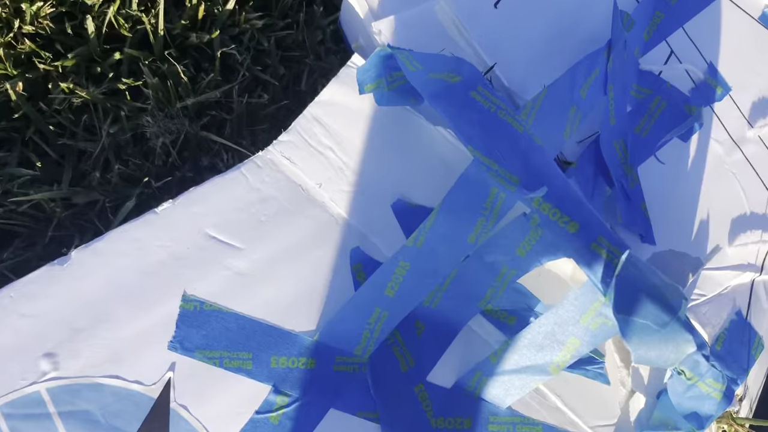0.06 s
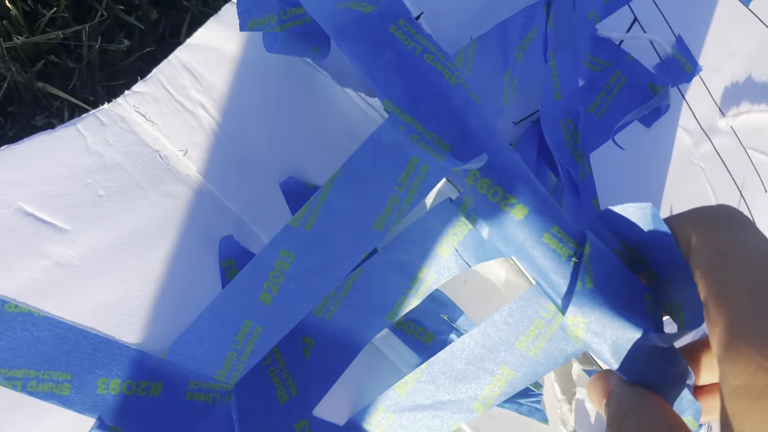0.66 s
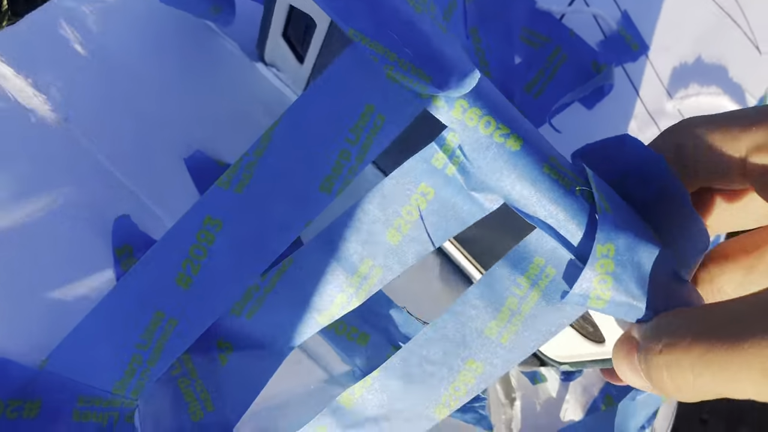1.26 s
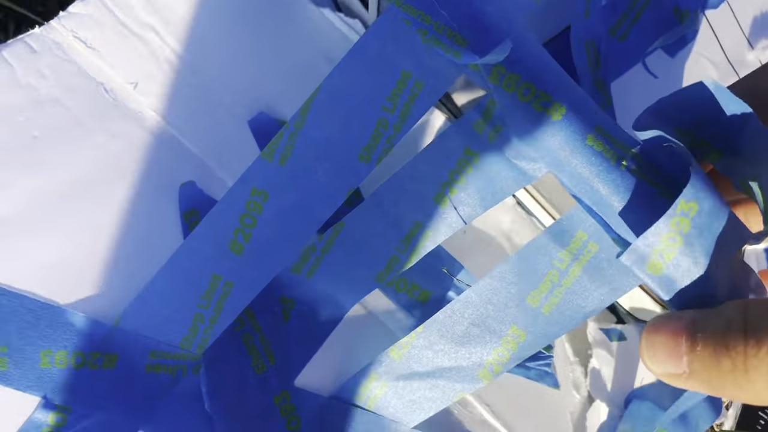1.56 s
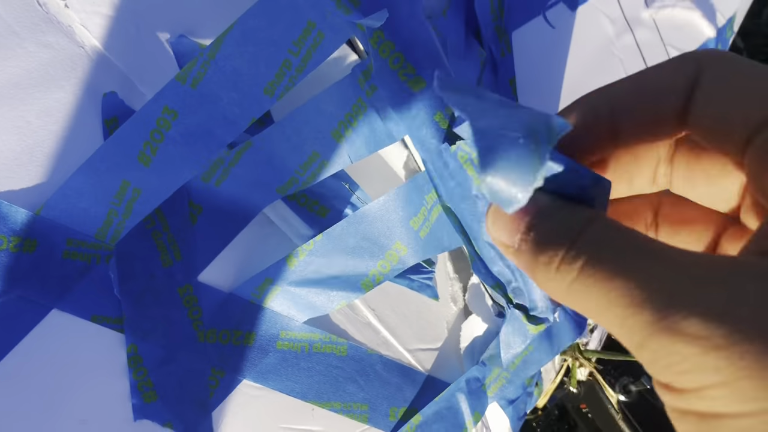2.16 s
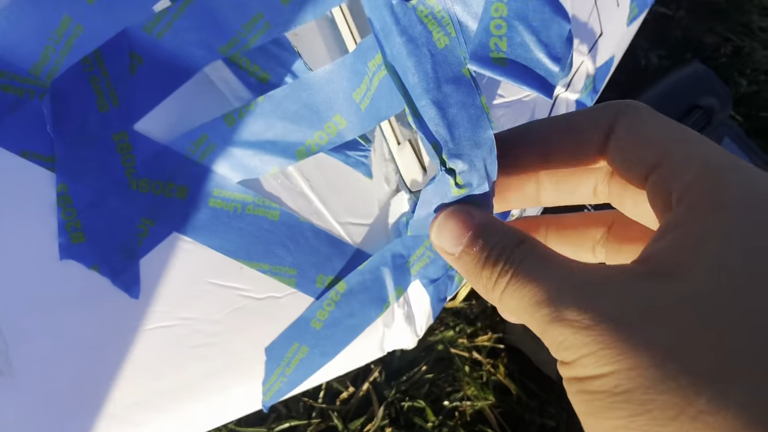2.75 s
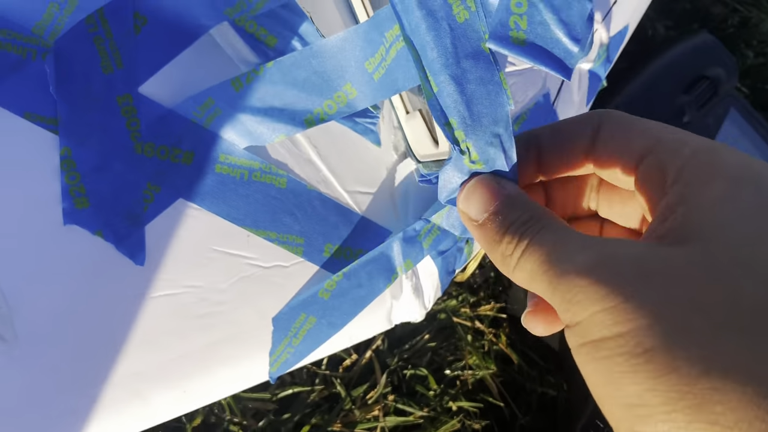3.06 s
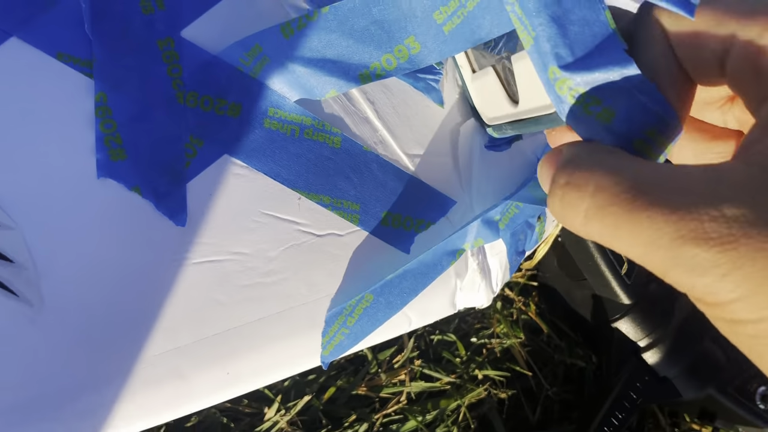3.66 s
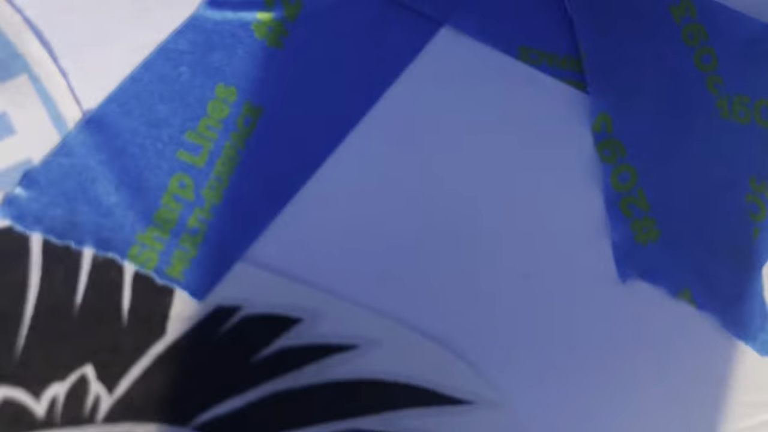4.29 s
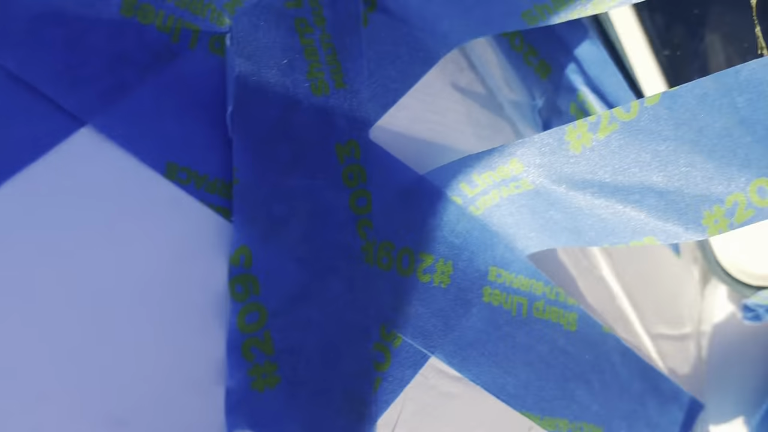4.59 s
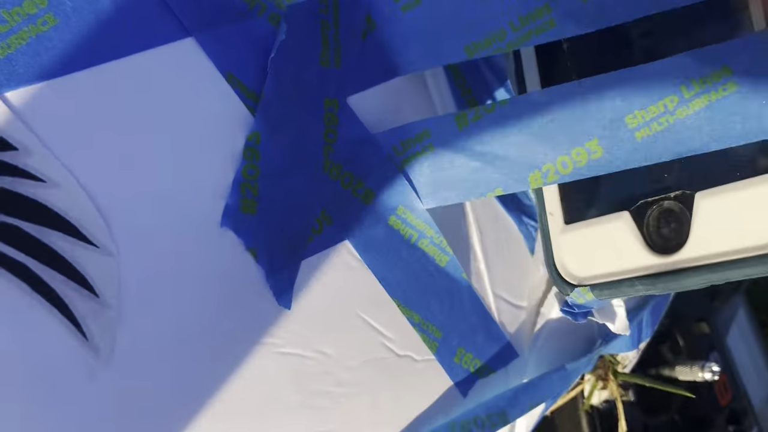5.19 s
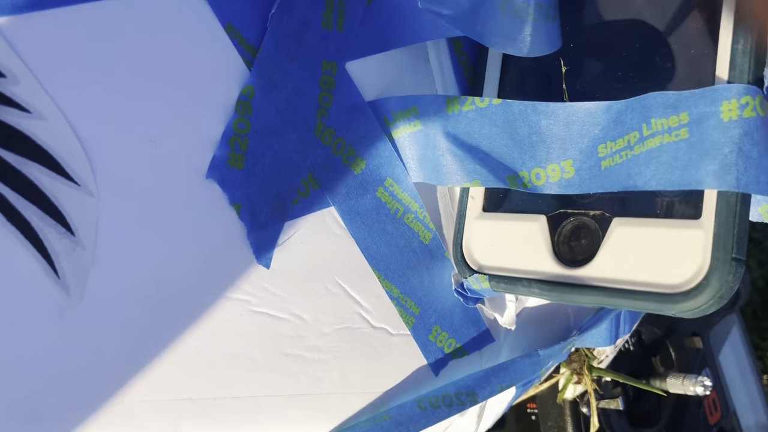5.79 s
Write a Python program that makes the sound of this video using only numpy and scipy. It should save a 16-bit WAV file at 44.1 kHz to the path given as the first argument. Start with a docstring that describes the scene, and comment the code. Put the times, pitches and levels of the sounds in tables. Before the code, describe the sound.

Outdoors, a distant bird chirps very faintly as close, dry crackling begins: a hand is peeling tape off a stiff sheet. Uneven pulls bring crinkles, sharp snaps, brief rips and the hiss of skin sliding on tape. The sheet buckles with hollow knocks. Toward the end the microphone moves closer with a low handling rumble, and the pops and crackles get louder before dying down.

```python
"""Close, dry crackling and snapping: fingers pick and pull at painter's tape stuck over a stiff sheet.
The glue lets go in countless tiny ticks, creases snap, short lengths rip free and skin slides on tape.
Underneath, the tugged sheet pops and rumbles, growing stronger as a hand-held phone comes close.
Far behind, a bird chirps faintly in the hush of the open air."""
import sys
import numpy as np
from scipy import signal
from scipy.fft import rfft, irfft
from scipy.io import wavfile
from scipy.ndimage import uniform_filter1d

SR = 44100
rng = np.random.default_rng(int(sys.argv[2]) if len(sys.argv) > 2 else 0)


def wrap_up_sound(samples):
    """Save the sound to the file named by the first command line argument, as 16-bit audio."""
    columns = np.atleast_2d(samples).T
    # keep every value between -1 and 1, then stretch to whole-number steps
    tamed = np.clip(columns, -1, 1)
    steps = np.round(tamed * 32767).astype(np.int16)
    wavfile.write(sys.argv[1], SR, steps)


N = 261634

# the louder creases snapping: start_s, level_db (before trim), pitch_hz, crack_db (relative), crumple_s
CREASE_SNAPS = [(.7437, -20, 4700, 1.5, 0.0026), (.7630, -26, 2920, 4.5, 0.006),
                (0.816, -30, 2230, -10, 0.0016), (0.8556, -32, 3620, 3, 0.0011),
                (0.9779, -30.5, 7040, -1, 0.00093), (1.0016, -20.5, 4040, -11, 0.0017),
                (1.062, -19.5, 3800, 1, 0.0012), (1.1155, -31.5, 7200, 7.5, .0006),
                (1.2097, -16.5, 1840, 5.5, 0.0015), (1.3383, -32, 4660, -4, 0.0016),
                (1.4447, -28.5, 4060, -2, 0.00046), (1.4923, -30, 2200, 4.5, 0.00049),
                (1.552, -24.5, 3620, -7, 0.001), (1.661, -25, 1860, 9.5, 0.0031),
                (1.668, -22, 3750, 0.5, 0.0013), (1.899, -22.5, 5000, 9, 0.0016),
                (1.9628, -34, 4900, 11, .0016), (2.0785, -26.5, 6200, 12, 0.0017),
                (2.111, -30.5, 2840, 12, 0.007), (2.1195, -32, 2560, 10.5, 0.002),
                (2.1553, -27.5, 4370, 5.5, 0.00086), (2.2400, -34.5, 5000, 11, 0.00033),
                (2.271, -26.5, 5100, 6, .0012), (2.299, -20, 1090, -0.5, 0.00058),
                (2.3239, -25, 970, 4, 0.00093), (2.409, -21, 2660, -5, 0.00088),
                (2.4988, -25.5, 1470, 4.5, 0.0032), (2.5348, -23.5, 910, 3, .0007),
                (2.5486, -32, 1800, 8.5, .0044), (2.9368, -35.5, 1700, 0.5, 0.0016),
                (2.996, -19, 1780, 6, 0.0022), (3.0019, -19.5, 1360, 1, 0.00044),
                (3.024, -27, 2190, -2, .0028), (3.1067, -31.5, 1200, 2.5, 0.00038),
                (3.2414, -28.5, 4620, 3.5, 0.0038), (3.3245, -31.5, 1620, 9, 0.00023),
                (3.4397, -13.5, 3600, -21, 0.0013), (3.4491, -19, 1550, 4.5, 0.0009),
                (3.8106, -21, 5160, -0.5, 0.00074), (3.9536, -29.5, 1080, -0.5, .001),
                (4.115, -22, 1130, 1, 0.00091), (4.1619, -22, 1310, 6.5, 0.0042),
                (4.237, -17, 4970, -15, 0.00083), (4.2647, -22.5, 1550, -25, 0.0016),
                (4.321, -15, 5700, 2, 0.00059), (4.421, -23.5, 2640, 6.5, 0.0017),
                (4.486, -19.5, 5720, -4, 0.0013), (4.5605, -21.5, 2950, 3, 0.001),
                (4.618, -24, 1430, 0, 0.00058), (4.647, -17, 1190, 6, .0038),
                (4.658, -17.5, 1180, 3, .0015), (4.6646, -10.5, 1520, 2, 0.0026),
                (4.7037, -21.5, 4840, 3, 0.00052), (4.7664, -21, 3380, 1.5, .0054),
                (4.7952, -25, 7160, 10, 0.0011), (4.835, -22, 2540, 3.5, 0.0018),
                (4.8407, -15, 4060, -3.5, 0.00048), (4.8663, -19, 5050, 5, 0.0011),
                (5.0556, -30.5, 1460, .5, 0.00088), (5.1342, -21.5, 1880, 7, 0.0049),
                (5.2138, -19, 890, -1.5, 0.00098), (5.4422, -26, 2375, 13, 0.0037),
                (5.459, -19, 920, 7, 0.0022), (5.47, -23.5, 890, 12, 0.0015), (5.5746, -21, 7300, 2, .0005),
                (5.745, -38.5, 1580, -7, .0015), (5.8835, -42.5, 5400, -11, 0.0018)]
# finger pulls: start_s, length_s, level_db, growth_db, glue_db (relative), crackle_db (relative)
FINGER_PULLS = [(.36, 0.19, -60, -1, 2, -1.5), (0.782, 0.17, -62.5, -9, 8.5, -9),
                (0.989, .35, -49.5, -3.5, -1.5, -6.5), (1.458, 0.2, -45, 5, -1.5, -7.5),
                (1.70, 0.091, -42, 12, -6, -7.5), (1.941, .46, -46, -4.5, 1, -1.5),
                (2.40, 0.18, -41.5, -5.5, -3, -3.5), (2.80, 0.038, -50, 6, -4, -11),
                (2.95, 0.21, -53.5, -8, -2, -0.5), (3.188, 0.15, -50, 8.5, -0.5, -0.5),
                (3.399, 0.071, -45, -1, -2, -7), (3.52, 0.72, -53, -5.5, 1, 0.5),
                (4.099, .17, -42, 3.5, -7.5, -6), (4.28, 0.14, -47.5, 7, -1.5, -6.5),
                (4.518, 0.048, -43, -2, 3.5, 1), (4.70, 0.18, -49, -10, 3.5, 2.5),
                (4.90, 0.36, -52.5, 9, 6.5, 0.5), (5.27, .19, -40, 4, 4, -5.5),
                (5.509, 0.094, -39.5, -14.5, -3.5, -1), (5.66, 0.078, -58.5, 0, -6, 2),
                (5.849, .05, -60, -9, 1, 10)]
# light finger contact between pulls: start_s, length_s, level_db, growth_db
FINGER_TOUCHES = [(0.303, 2.34, -54.5, 7.5), (2.66, 0.29, -60, -7), (2.942, 2.7, -52.5, -5.5),
                  (5.606, 0.36, -63, -4)]
# lengths of tape ripping free: start_s, length_s, level_db, growth_db, boom_db (relative)
TAPE_RIPS = [(1.612, .019, -29, 5, -4), (2.451, 0.054, -40.5, 9, 0.5), (4.6419, 0.0293, -27, -4, -3),
             (5.4087, 0.072, -28.5, 4, 1)]
# skin and tape sliding over each other: start_s, length_s, level_db, pitch_hz
SKIN_SLIDES = [(0.397, 0.035, -51, 5150), (0.483, 0.035, -48, 5330), (0.544, 0.014, -36, 4940),
               (1.893, 0.032, -24.5, 6800), (4.933, 0.21, -43.5, 3000), (5.252, 0.038, -33.5, 4100),
               (5.405, .08, -24, 8600)]
# the sheet buckling and thumping: start_s, level_db, pitch_hz, overtone_db (relative)
SHEET_POPS = [(.1800, -29.5, 85, -17), (0.7436, -20.5, 570, -5), (0.744, -26, 90, -5),
              (1.631, -14.5, 543, 6), (1.632, -29, 72, -4), (1.714, -18, 570, -4.5), (1.726, -21.5, 616, 5),
              (1.7948, -14, 653, 3.5), (1.842, -23, 634, 2), (2.807, -27.5, 231, -4.5),
              (3.385, -25.5, 171, 3), (4.649, -14, 575, -12), (4.6665, -10, 490, -2), (4.672, -9.5, 76, -3),
              (4.68, -16, 185, -14), (5.1388, -15.5, 720, -7), (5.2153, -10, 532, -23),
              (5.338, -16.5, 490, -11), (5.44, -11, 446, -30), (5.4608, -5, 552, -17),
              (5.469, -11, 201, -7), (5.473, -20, 72, -3), (5.5546, -10, 428, -2.5),
              (5.6227, -21.5, 607, -0.5)]
# the sheet jerking and shuddering on: start_s, level_db
SHEET_JOLTS = [(0.743, -36.5), (1.619, -35), (1.788, -39), (4.665, -24), (5.46, -34.5), (5.553, -38)]
# lift on the sheet's knocks, scrape and rumble as the phone comes close: time_s, gain_db
SHEET_NEARNESS = [(0, -4), (2.3, -1), (3.6, -1.5), (4.2, 0.5), (4.6, 5), (5.0, 0), (5.35, 4.5), (5.93, -3)]
# rumble of the hand holding the phone still, then swinging it in: time_s, level_db
HAND_SWING = [(0, -55.5), (4.1, -53), (4.4, -40), (4.62, -40), (4.95, -52), (5.93, -49.5)]
# a distant bird: start_s, length_s, from_hz, to_hz, level_db
BIRD_CHIRPS = [(.04, .073, 4070, 3780, -72), (0.23, .04, 3400, 3300, -69), (.252, 0.05, 4170, 3020, -66),
               (0.689, 0.042, 3670, 4170, -64)]

# tone curves: frequency_hz, gain_db
GLUE_TONE = [(2500, -23), (4000, -1), (5500, -1.5), (8000, 0), (16000, 0)]  # bright fizz of parting glue
PAPER_TONE = [(600, -22.5), (1000, -2.5), (1400, 2.5), (2200, -2.5), (3200, -4), (4500, -6.5),
              (6000, -12.5), (9000, -39.5)]  # midrange rustle of the tape's paper
SHEET_TONE = [(30, -51), (120, -18), (250, -6), (420, -1), (560, 0.5), (750, -2.5), (1100, -9),
              (1500, -23.5), (3000, -45.5)]  # hollow body of the sheet
RUMBLE_TONE = [(15, -35), (35, -13.5), (60, -1.5), (85, -0.5), (140, -0.5), (210, -4), (290, -11),
               (500, -28.5), (1500, -79)]  # low end of tugging and handling
AIR_TONE = [(120, -32), (200, -4), (636, -18), (1200, -17.5), (4010, -25), (5450, -30.5), (15000, -34.5)]  # quiet outdoor air

SNAP_TRIM_DB, RUSTLE_TRIM_DB, AIR_DB = -0.66, -0.35, -60.5
KNOCK_DB, KNOCK_SHARE = -18.5, 0.34  # the sheet's knock gains only this share of each dB of a snap
STRAY_DB, STRAY_SPREAD_DB = 5, 12.5  # stray creases, over the crackle envelope
STRAY_LOWEST_HZ, STRAY_OCTAVES, STRAY_CRUMPLE_S = 1390, 1.88, 0.00085
PULL_ATTACK_S, PULL_RELEASE_S = 0.02, 0.024
TOUCH_GLUE_DB, TOUCH_CRACKLE_DB = -2.5, -4  # relative to the touch
SCRAPE_DB, RUMBLE_DB = -1, -7  # what a pull stirs in the sheet, relative to the pull
POP_DECAY_CYCLES = 2.35
JOLT_RISE_S, SHUDDER_DECAY_S = 0.0078, 0.045
SHUDDER_RUSTLE_DB, SHUDDER_RUMBLE_DB = -7, -0.5  # relative to the jolt
TREBLE_EDGE_HZ = 15900


def snap(s, db, hz, crack_db, thud_db, crumple_s, size=1500):
    """A crease flips: fibres crack, the paper facet rings a few cycles, the sheet takes a small knock."""
    t = np.arange(size) / SR
    onset = 1 - np.exp(-(t / (0.16 * abs(crumple_s) + 1e-5)) ** 2)  # longer crumples build more slowly
    decay = np.exp(-t / max(crumple_s * 0.7, 1e-4)) + 0.024 * np.exp(-t / 0.0091)
    fibres = rng.standard_normal(size) * onset * decay
    crack = colour(fibres, [(hz * 0.45, -25), (hz * 1.27, -1), (hz * 3, -1), (hz * 12, -5)], ripple_db=3)
    flutter_tone = [(hz * 0.53, -25), (hz * 0.7, -2), (hz * 1.455, -2), (hz * 1.45, -25)]
    flutter = colour(fibres, flutter_tone, ripple_db=6.5)
    facet = blip(onset * ring(t, hz, 2.3 / hz)) + 0.87 * blip(flutter)
    knock = rng.standard_normal(size) * onset * np.exp(-t / 0.0021)
    thud_tone = [(100, -16), (300, -3), (550, 0), (550 + hz * 0.62, -3), (600 + hz * 2.66, -28)]
    thud = colour(knock, thud_tone, ripple_db=5)
    return s, amp(db) * (blip(facet) + amp(crack_db) * blip(crack) + amp(thud_db) * blip(thud))


def crease(s, db, hz, crack_db, crumple_s):
    """A foreground snap, whose knock on the sheet follows its level and the phone's nearness."""
    knock_db = KNOCK_DB + KNOCK_SHARE * db + near_db(s)
    return snap(s, db, hz, crack_db, knock_db - db, crumple_s)


def crinkles(creasing, count=125):
    """Small stray creases snap at random, riding the crackle envelope of the fingers."""
    mix = np.zeros(N)
    for when, pitch, size, crack in rng.random((count, 4)):
        db = STRAY_DB + STRAY_SPREAD_DB * size
        hz = STRAY_LOWEST_HZ * 2 ** (STRAY_OCTAVES * pitch)
        s, sound = snap(when * N / SR, db, hz, 13.5 * crack, thud_db=-4, crumple_s=STRAY_CRUMPLE_S)
        add(mix, s, creasing[int(when * N)] * sound)
    return mix


def peeling(effort, peel, creasing, shudder):
    """Parting glue fizzes, with clumps of larger ticks, and sounds through glue, paper and sheet."""
    clumps = amp(1.6 * wander(260))
    grip = np.clip((creasing + shudder) / (effort + shudder + 1e-9), 0, 1)  # slack tape does not crackle
    fizz = rng.standard_normal(N) * amp(2 * grip * wander(130))
    crackle = grip * unit(ticks(N, per_s=380, spread_db=4.5) * clumps)
    glue = flexing(fizz + 1.06 * crackle, GLUE_TONE, ripple_db=3.5)
    paper = flexing((fizz + 1.22 * crackle) * rng.choice([-1, 1], N), PAPER_TONE, ripple_db=4)
    sheet = flexing(fizz + 0.52 * crackle, SHEET_TONE, ripple_db=3.5)
    scrape = effort * amp(SCRAPE_DB + near_db(np.arange(N) / SR))
    return glue * peel + paper * (effort + amp(SHUDDER_RUSTLE_DB) * shudder) + sheet * (scrape + shudder)


def pull(s, length_s, db, growth_db):
    """Envelope of one pull: it takes hold, grows or eases, and lets go."""
    t = np.arange(0, length_s + 10 * PULL_RELEASE_S, 1 / SR)
    held = amp(db + growth_db * (np.minimum(t / length_s, 1) - .5))
    release = np.exp(-np.maximum(t - length_s, 0) / PULL_RELEASE_S)
    return s, held * np.minimum(t / PULL_ATTACK_S, 1) * release


def finger_envelopes():
    """Pulls and light touches blend into envelopes for the effort, the parting glue and the crackle."""
    s, length_s, db, growth_db, glue_db, crackle_db = np.transpose(FINGER_PULLS)
    touch = play(pull, FINGER_TOUCHES)
    envelopes = []
    for extra_db, touch_db in [(0, 0), (glue_db, TOUCH_GLUE_DB), (crackle_db, TOUCH_CRACKLE_DB)]:
        pulls = play(pull, zip(s, length_s, db + extra_db, growth_db))
        envelopes.append(np.hypot(touch * amp(touch_db), pulls))
    return envelopes


def rip(s, length_s, db, growth_db, boom_db):
    """A run of glue strands breaks in quick succession and drums on the sheet."""
    count = int(length_s * SR)
    swell = amp(growth_db * np.linspace(-.5, .5, count)) * signal.windows.tukey(count, .25)
    strands = np.pad(ticks(count, per_s=6000, spread_db=3.5) * swell, (0, 600))  # room to ring out
    tear_tone = [(400, -26), (900, -6), (1500, 8.5), (3000, 1.5), (6000, -4), (10000, -10), (16000, -4)]
    tear = unit(colour(strands, tear_tone, ripple_db=4))
    boom = unit(colour(strands, SHEET_TONE, ripple_db=2.5))
    return s, amp(db) * np.sqrt(len(strands) / count) * (tear + amp(boom_db) * boom)


def slide(s, length_s, db, hz):
    """Skin on tape: a friction hiss with a rasping peak, its colour shifting as the contact moves."""
    count = int(length_s * SR)
    _, _, spectra = signal.stft(rng.standard_normal(count + 512), SR, nperseg=256)
    patches = uniform_filter1d(rng.standard_normal(spectra.shape), size=5, axis=0)  # across frequency
    patches = unit(uniform_filter1d(patches, size=9, axis=1))  # across time
    hiss = signal.istft(spectra * amp(3.2 * patches), nperseg=256)[1][:count]
    rasp = colour(hiss, [(hz / 2, -12), (hz, 1), (hz * 1.4, -3), (hz * 5, -3)])
    return s, amp(db) * unit(rasp) * signal.windows.tukey(count, .5)


def pop(s, db, hz, overtone_db, size=3000):
    """The sheet buckles: a hollow main mode and quicker, inharmonic overtones, with a soft attack."""
    t, decay_s = np.arange(size) / SR, POP_DECAY_CYCLES / hz
    overtones = sum(gain * ring(t, hz * ratio * rng.uniform(0.828, 1.122), decay_s * 0.7 / ratio ** .5)
                    for ratio, gain in [(1.55, 0.59), (2.2, -0.74), (2.9, 0.61)])
    modes = blip(ring(t, hz, decay_s)) + amp(overtone_db) * blip(overtones)
    radiated = colour(modes, [(hz / 4, -16), (hz * .85, 0), (hz * 3, 0), (hz * 7, -22), (hz * 20, -45)])
    return s, amp(db) * blip(radiated)


def jolt(s, db):
    """Envelope of the shudder after one jerk of the sheet."""
    t = np.arange(0, 10 * SHUDDER_DECAY_S, 1 / SR)
    return s, amp(db) * np.minimum(t / JOLT_RISE_S, 1) * np.exp(-t / SHUDDER_DECAY_S)


def handling(effort, shudder):
    """Lumpy rumble of the tugged sheet and the hand-held phone."""
    t = np.arange(N) / SR
    bumps = unit(ticks(N, per_s=90, spread_db=4)) + 0.94 * rng.standard_normal(N)
    tugged = effort * amp(RUMBLE_DB + near_db(t)) + amp(SHUDDER_RUMBLE_DB) * shudder
    swung = amp(np.interp(t, *np.transpose(HAND_SWING)))
    return unit(colour(bumps, RUMBLE_TONE)) * np.hypot(swung, tugged)


def chirp(s, length_s, from_hz, to_hz, db):
    """A far-off bird's thin, gliding whistle."""
    count = int(length_s * SR)
    phase = 2 * np.pi * np.cumsum(np.linspace(from_hz, to_hz, count)) / SR
    return s, amp(db) * unit(np.sin(phase) * signal.windows.tukey(count, .5))


def air():
    """A faint, steady bed of open air."""
    return amp(AIR_DB) * unit(colour(rng.standard_normal(N), AIR_TONE))


def near_db(s):
    """How much the sheet gains from the phone's closeness at time s."""
    return np.interp(s, *np.transpose(SHEET_NEARNESS))


def flexing(drive, tone, ripple_db, size=2048):
    """Colours a sound in short overlapping grains: the resonances of bending paper never stay put."""
    padded, out = np.pad(drive, size), np.zeros(N + 3 * size)
    window = signal.windows.hann(size, sym=False)
    for start in range(0, N + size, size // 2):
        grain = np.pad(padded[start:start + size] * window, (0, size))
        out[start:start + 2 * size] += colour(grain, tone, ripple_db)
    return unit(out[size:size + N])


def colour(x, tone, ripple_db=0, size=2048):
    """Equalises to a tone curve, plus random peaks and dips that differ at each use."""
    hz, db = np.transpose(tone)
    log_hz = np.log(np.fft.rfftfreq(size, 1 / SR) + 1)
    ripple = np.interp(log_hz, np.linspace(np.log(200), np.log(SR / 2), 44), rng.standard_normal(44))
    curve_db = np.interp(log_hz, np.log(hz), db) + ripple_db * ripple
    cepstrum = irfft(np.log(amp(curve_db)))
    cepstrum[1:size // 2] *= 2  # minimum phase: nothing rings ahead of an attack
    cepstrum[size // 2 + 1:] = 0
    return signal.fftconvolve(x, irfft(np.exp(rfft(cepstrum))))[:len(x)]


def ring(t, hz, decay_s):
    """One struck mode."""
    return np.sin(2 * np.pi * hz * t) * np.exp(-t / max(decay_s, 1e-4))


def ticks(count, per_s, spread_db):
    """Random clicks: many small, a few large."""
    chance, size, sign = rng.random(count), rng.exponential(1, count), rng.choice([-1, 1], count)
    return (chance < per_s / SR) * sign * amp(spread_db * np.minimum(size, 4.5))


def wander(samples):
    """Random modulation, smoothed over this many samples."""
    return unit(uniform_filter1d(rng.standard_normal(N), size=samples))


def amp(db):
    """Decibels to gain."""
    return 10 ** (np.asarray(db) / 20)


def unit(x):
    """Scales to an rms of 1."""
    return x / np.sqrt(np.mean(x ** 2) + 1e-20)


def blip(x):
    """Scales a short sound to the energy of one millisecond at full level."""
    return x * np.sqrt(SR / 1000 / (np.sum(x ** 2) + 1e-20))


def add(mix, s, sound):
    """Mixes a sound in at time s."""
    part = mix[max(round(s * SR), 0):][:len(sound)]
    part += sound[:len(part)]


def play(source, table):
    """Lays every row of a cue table onto one track."""
    mix = np.zeros(N)
    for row in table:
        add(mix, *source(*row))
    return mix


def scene():
    """A dry mono mix: tape up front, the sheet beneath it, bird and air far behind."""
    effort, peel, creasing = finger_envelopes()
    shudder = play(jolt, SHEET_JOLTS)
    snaps = amp(SNAP_TRIM_DB) * play(crease, CREASE_SNAPS)
    tape = snaps + crinkles(creasing) + play(rip, TAPE_RIPS) + play(slide, SKIN_SLIDES)
    rustle = amp(RUSTLE_TRIM_DB) * peeling(effort, peel, creasing, shudder)
    body = play(pop, SHEET_POPS) + handling(effort, shudder)
    outdoors = play(chirp, BIRD_CHIRPS) + air()
    return (tape + rustle + body + outdoors)[None]


def record(dry):
    """The phone's band limit cuts the very top of the treble."""
    lowpass = signal.firwin(401, TREBLE_EDGE_HZ, window=("kaiser", 8), fs=SR)
    return signal.oaconvolve(dry, lowpass[None], "same")


dry = scene()
out = record(dry)
wrap_up_sound(out)
```